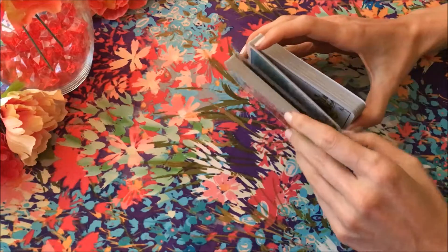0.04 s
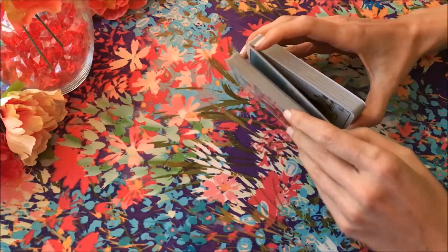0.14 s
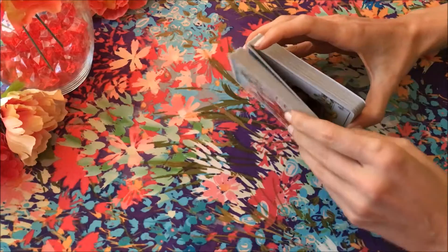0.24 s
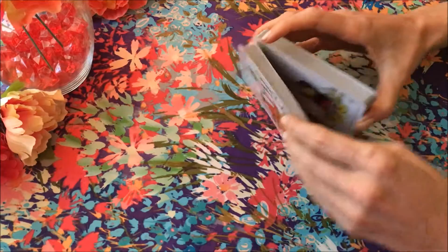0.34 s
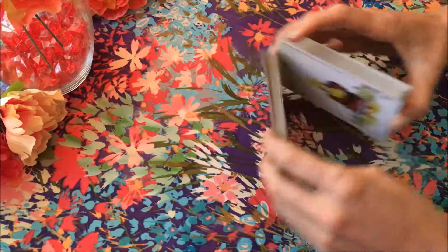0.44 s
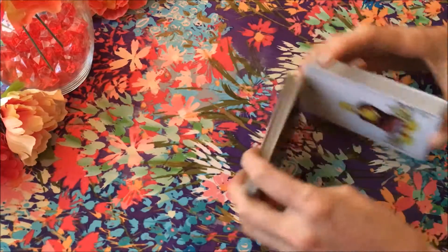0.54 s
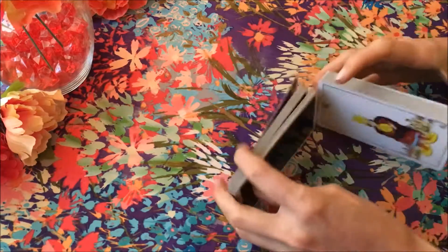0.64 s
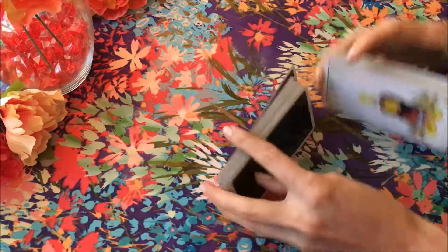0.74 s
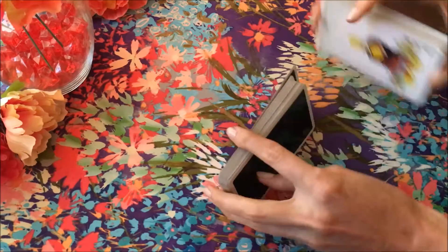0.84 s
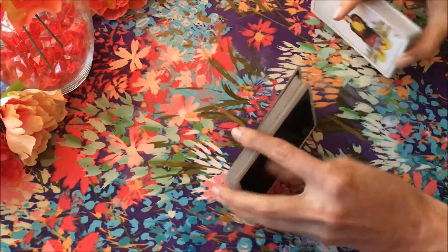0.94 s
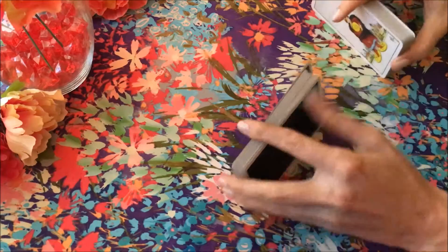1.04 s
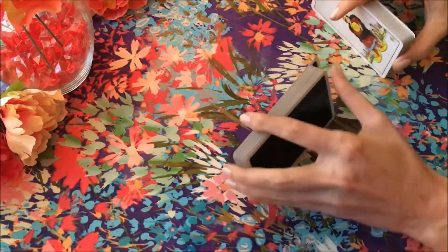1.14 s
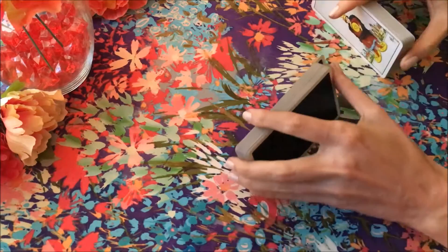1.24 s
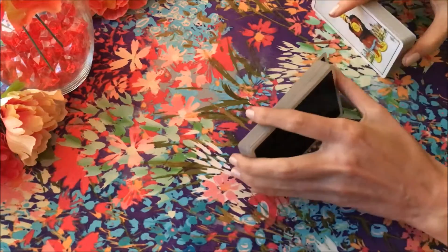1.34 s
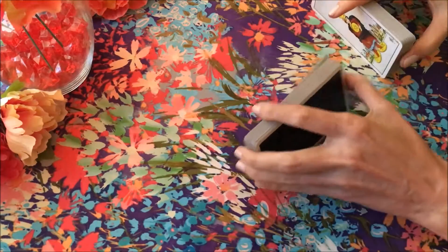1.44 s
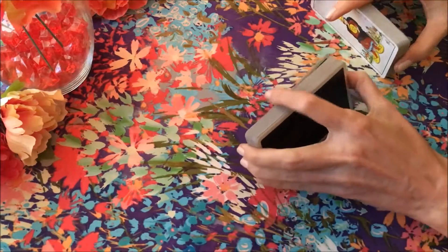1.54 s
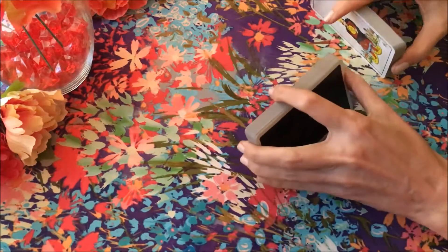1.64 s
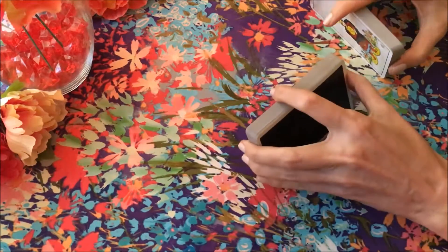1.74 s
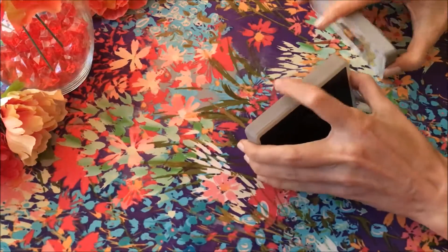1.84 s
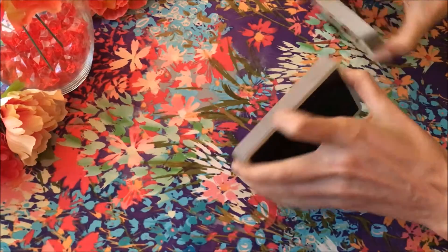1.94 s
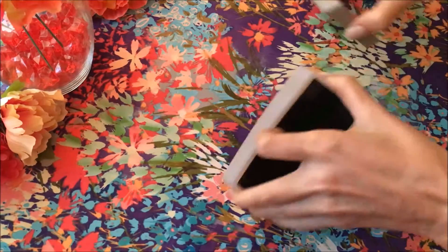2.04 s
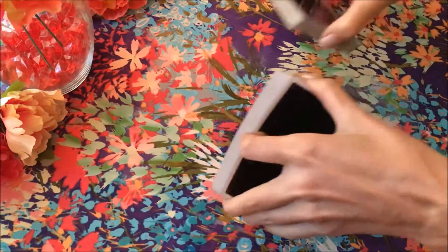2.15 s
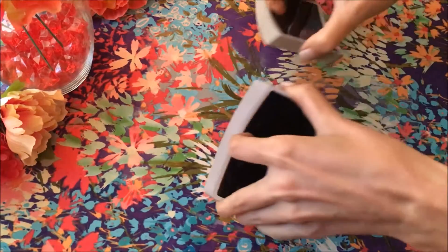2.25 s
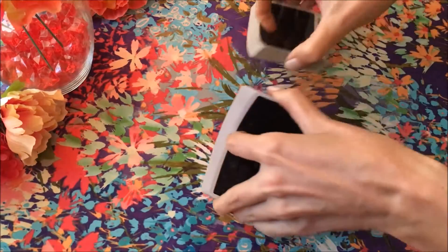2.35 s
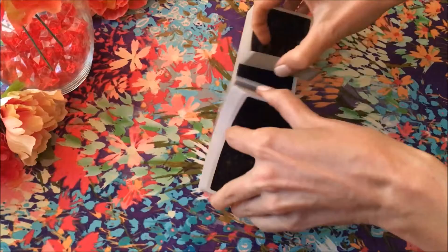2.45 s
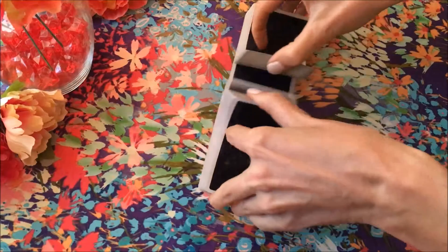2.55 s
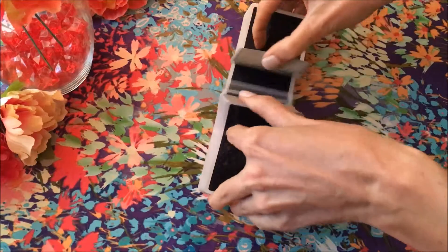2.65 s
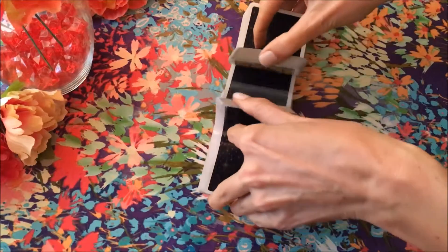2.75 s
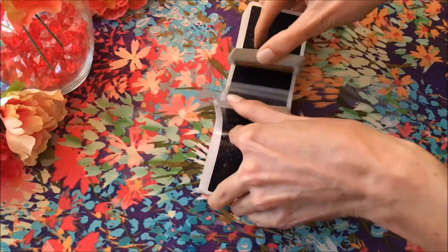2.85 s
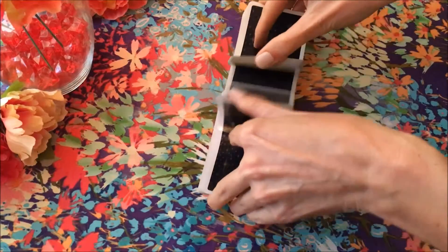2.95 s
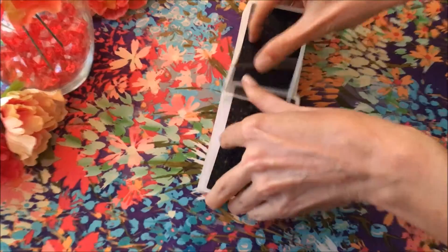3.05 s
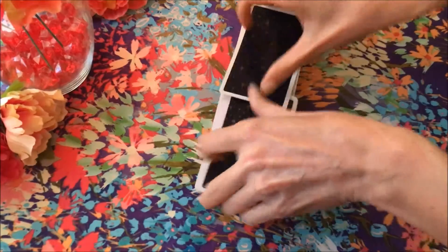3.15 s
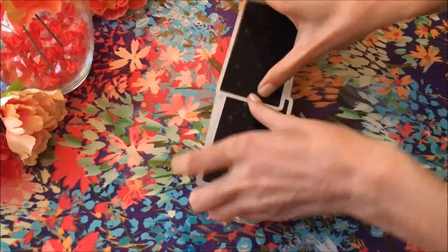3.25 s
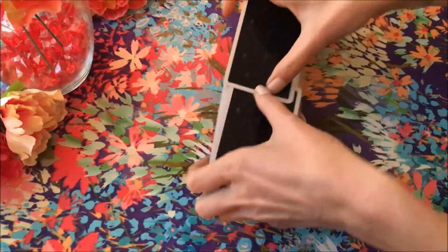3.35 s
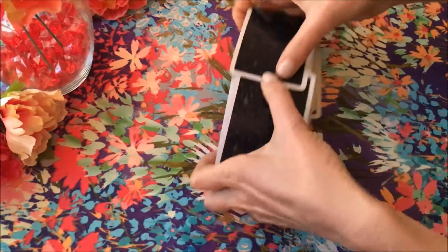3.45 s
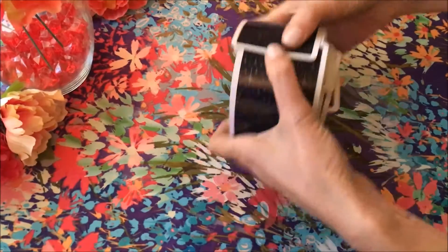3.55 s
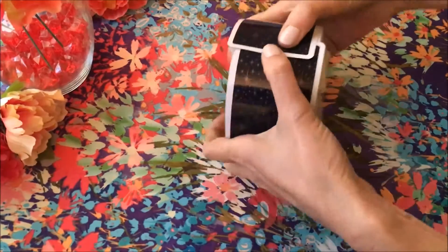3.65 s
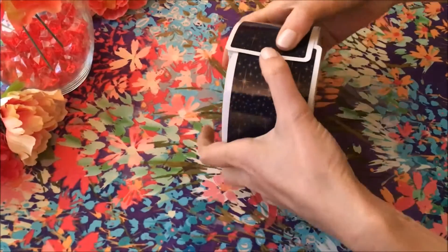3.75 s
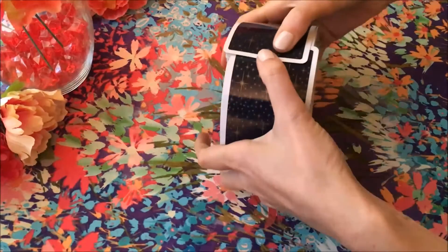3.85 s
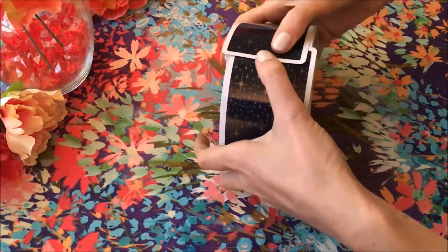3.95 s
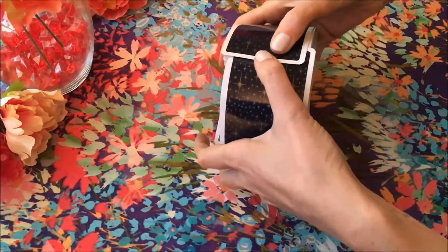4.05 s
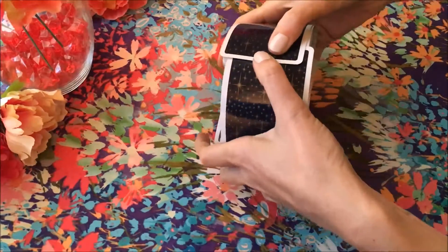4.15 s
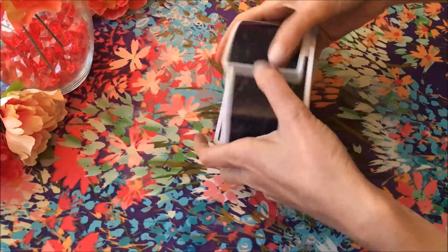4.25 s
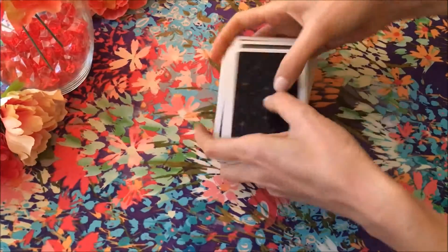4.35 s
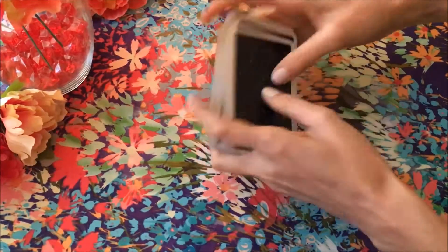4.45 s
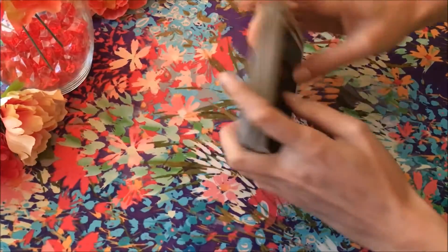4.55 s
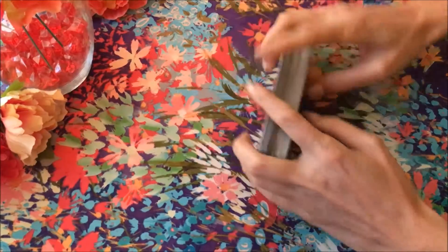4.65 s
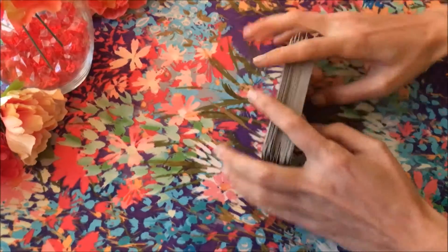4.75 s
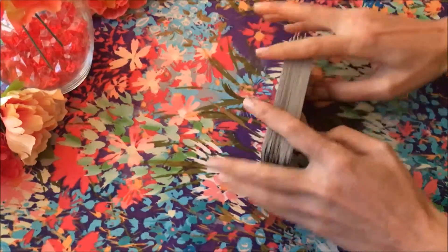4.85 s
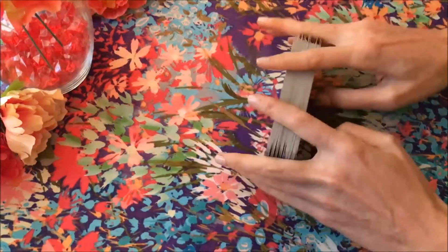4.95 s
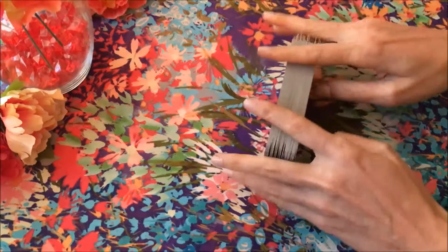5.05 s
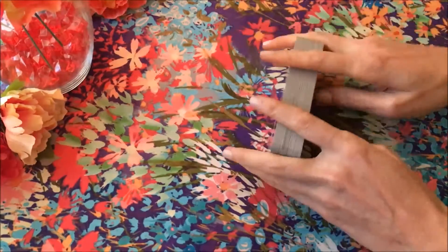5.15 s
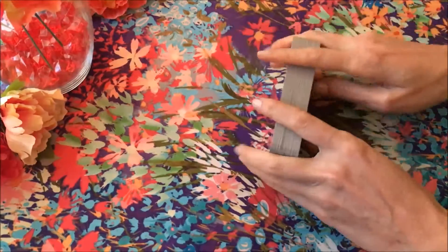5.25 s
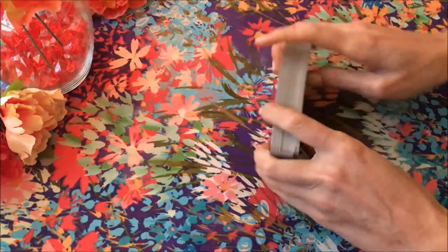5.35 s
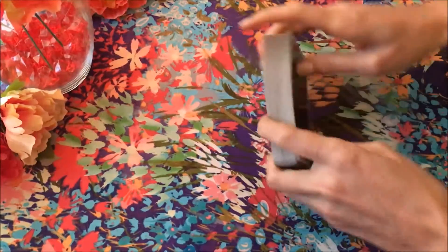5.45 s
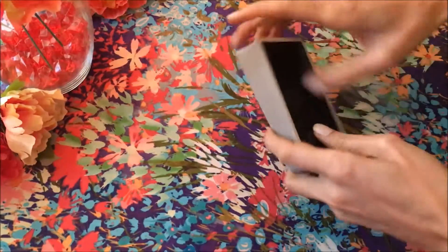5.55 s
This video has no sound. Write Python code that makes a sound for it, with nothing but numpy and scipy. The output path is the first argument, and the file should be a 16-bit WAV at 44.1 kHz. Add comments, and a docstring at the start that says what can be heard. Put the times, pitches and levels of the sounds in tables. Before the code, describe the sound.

Close single microphone, small room, low uneven room tone. Near silence at first with whispery finger rubs and two muffled taps; then a sudden crackling cluster of card snaps over rasping friction that grows and stops abruptly. A sparser, quieter slide with small clicks follows, then a blunt, slightly spread slap of the deck on a padded table, a weak second tap, and soft handling to the end.

```python
"""A small quiet room with a low rumble: two halves of a stiff card deck are tapped on a cloth-covered
table, pushed into each other with dense rustling and edge snaps, then knocked square.
Rubbing is filtered friction noise, snaps are short decaying air-pocket rings with edge ticks, knocks are
dulled noise bursts with table modes. Fingers brush the cards; reflections and room tone surround them,
and one microphone hears it all."""
import sys
import numpy as np
from scipy import signal
from scipy.io import wavfile
from scipy.ndimage import uniform_filter1d

SR = 44100
rng = np.random.default_rng(int(sys.argv[2]) if len(sys.argv) > 2 else 0)


def generate_wav(signal):
    """Clip the signal to [-1, 1] and save it as 16-bit WAV at the path in sys.argv[1]."""
    frames = np.transpose(np.atleast_2d(signal))
    scaled = np.clip(frames, -1, 1) * 32767
    pcm = np.round(scaled).astype(np.int16)
    wavfile.write(sys.argv[1], SR, pcm)


N = 246959  # samples

# The two pushes, one list each: t/s, rubbing level/dB, fine hiss level/dB
PUSH_LEVELS = [
    [(2.6, -46.5, -70), (2.666, -45, -55.5), (2.79, -43, -54), (2.86, -43.5, -46), (3.02, -41, -56),
     (3.09, -41.5, -65), (3.14, -37.5, -52), (3.22, -40, -39.5), (3.3, -79, -80)],
    [(3.756, -49.5, -78), (3.835, -86, -69.5), (3.865, -53, -60), (4.03, -57.5, -56), (4.12, -56, -58.5),
     (4.3, -47, -57), (4.35, -58, -61), (4.426, -48, -51.5), (4.506, -72, -74.5), (4.6, -95, -97)],
]
# Stiff card body, spectral density: f/Hz, level/dB per Hz
CARD_BODY_SPECTRUM = [(290, -47.5), (500, -2), (786, -8), (1030, 1), (1310, -2), (2100, 3.5), (2730, -5.5),
                      (3240, -8.5), (3740, -16.5), (5000, -33.5), (6500, -35.5), (11000, -120)]
# Card faces and edges, spectral density: f/Hz, level/dB per Hz
CARD_FACE_SPECTRUM = [(2060, -24), (3500, -2.5), (3750, -8), (4840, -11), (5860, -9.5), (6440, -10),
                      (7650, -12.5), (9200, -9.5), (12100, -16.5), (15200, -19), (16000, -43)]
# Hands pushing on deck and table, spectral density: f/Hz, level/dB per Hz
HAND_SHOVE_SPECTRUM = [(35, -30.5), (60, -11), (113, -0.5), (195, -9.5), (259, -5), (451, -9.5), (900, -23),
                       (1170, -37), (1980, -120)]
# Card edges snapping past each other: t/s, ring peak level/dB, ring f/Hz, crisp edge level/dB,
# ring decay constant/cycles
SNAP_EVENTS = [(2.581, -53.5, 1120, -81, 3.5), (2.602, -37, 1890, -74, 2.8), (2.623, -16, 1780, -45, 3.1),
               (2.63, -17.5, 1920, -34.5, 2.6), (2.64, -19.5, 1840, -41.5, 1.5),
               (2.697, -31, 1940, -61, 1.8), (2.736, -27.5, 1580, -49, 2.3),
               (2.804, -20.5, 1880, -41.5, 1.5), (2.829, -9, 2024, -33.5, 1.95),
               (2.896, -25.5, 1720, -31.5, 3.6), (2.903, -29, 2574, -40, 4.6),
               (2.934, -22, 2050, -39, 0.89), (2.958, -53, 3100, -34, 2.4),
               (2.966, -18.5, 2160, -38.5, 0.72), (3.013, -25, 1770, -33, 3),
               (3.023, -20, 1930, -33.5, 2.3), (3.031, -20, 2600, -37, 3.7), (3.044, -22.5, 1828, -31, 1),
               (3.070, -17.5, 1880, -34.5, 1.2), (3.08, -20, 1756, -35, 1), (3.082, -14.5, 1646, -41.5, .9),
               (3.087, -27, 2300, -31, 2), (3.114, -15.5, 1750, -57, 1.2), (3.121, -19, 1680, -39.5, 1.4),
               (3.128, -22, 2905, -46.5, 3.8), (3.136, -14, 1895, -25.5, 2.1), (3.146, -16, 3170, -32, 2.9),
               (3.169, -18, 1970, -38, 1.2), (3.185, -28, 2520, -45, 3.2), (3.218, -25, 2055, -35.5, 1.8),
               (3.755, -34.5, 1910, -64, 2.8), (3.875, -26.5, 1770, -41.5, 3.2),
               (3.923, -29, 1600, -56, 1.5), (3.956, -29.5, 2000, -45, 2), (4.014, -33, 1950, -63, 2.4),
               (4.033, -31, 1600, -49, 1), (4.16, -34, 1710, -65, 2.6), (4.176, -29.5, 1960, -54, 2.3),
               (4.185, -28.5, 1830, -57, 2), (4.225, -30, 1800, -62, 2.4), (4.268, -26, 1840, -53.5, 2.8),
               (4.28, -31.5, 1540, -51, 2.3), (4.308, -20.5, 1970, -49, 1.45),
               (4.413, -22, 1730, -58, 0.94), (4.417, -25.5, 2190, -46, 4.4),
               (4.456, -17.5, 1952, -49.5, 4.9), (4.464, -23.5, 2050, -72, 5.8)]
# Card edge rings: mean f/Hz, mean level/dB relative to the crisp edge, t60/s
EDGE_MODES = [(3250, 5.5, 0.0095), (6585, 7, 0.0066), (9150, 8, 0.005), (12520, -1.5, 0.00072)]
# The deck landing on the table: t/s, slap level/dB, hardness as top f/Hz, time to full contact/s,
# settling time constant/s, card body level/dB, table thump level/dB relative to slap, thump centre f/Hz
KNOCK_EVENTS = [(.754, -52.5, 1140, 0.0014, 0.042, -12, 10.5, 280),
                (1.145, -46.5, 1530, 0.0024, 0.036, -5.5, 3.5, 212),
                (4.776, -26, 3910, 0.031, 0.027, 10, -12.5, 469),
                (4.862, -40, 1260, 0.0091, 0.012, -15, -3.5, 327),
                (5.26, -66.5, 2005, 0.0205, 0.021, -7, 7.5, 330),
                (5.577, -73, 1500, 0.00372, 0.014, -2.5, 6.5, 300)]
# Table top modes: f/Hz, level/dB before the struck spot weights them, t60/s
TABLE_MODES = [(67.6, 1, 0.14), (128.1, 7.5, 0.16), (177.4, 2.5, 0.1), (281, 6.5, 0.059), (332, 9, 0.063),
               (384.5, 5, 0.12), (632, 6.5, 0.066), (945, -6, .08), (1165, -3, .1), (1770, 1, .08)]
# Fingers brushing and shifting the cards: loudest t/s, soft rub level/dB, fine hiss level/dB,
# swell time/s, fade time/s
BRUSH_STROKES = [(.282, -71, -80, .04, 0.041), (.446, -66.5, -75.5, 0.1, 0.1),
                 (.75, -71.5, -84, 0.18, 0.032), (.818, -68.5, -76, 0.17, 0.15),
                 (1.14, -61.5, -69.5, 0.073, 0.024), (1.216, -65.5, -74, 0.092, 0.26),
                 (1.59, -69, -80, 0.032, 0.18), (2.24, -80, -87, 0.88, 0.069),
                 (2.458, -67, -86, 0.059, 0.074), (3.44, -64, -68.5, 0.32, 0.16),
                 (3.68, -66, -74, 0.11, 0.15), (4.73, -74.5, -76.5, 0.28, .05),
                 (5.063, -63.5, -77.5, 0.13, 0.14), (5.276, -71.5, -76, 0.055, 0.085),
                 (5.54, -74.5, -75, 0.13, 0.088), (5.59, -75, -67, 0.035, 0.091)]
# Short soft rubs that sound the air pocket between cards: t/s, level/dB, f/Hz, length/s
POCKET_RUBS = [(3.384, -56.5, 1840, 0.053), (3.441, -56, 1913, 0.014), (3.645, -62.5, 2220, 0.063),
               (3.792, -54.5, 1900, 0.078), (4.086, -47, 1950, 0.024), (4.356, -37.5, 2120, 0.011),
               (4.397, -41.5, 2130, 0.012)]
# Near walls and ceiling: delay t/s, level/dB
NEAR_ECHOES = [(.0078, -16), (0.012, -24.5), (0.018, -26.5), (.026, -25.5)]
# Reverberation time: f/Hz, t60/s
ROOM_DECAY = [(100, 1), (300, 0.51), (900, 0.45), (2000, 0.39), (5000, 0.36), (12000, 0.22)]
# Room tone, spectral density: f/Hz, level/dB per Hz
AIR_SPECTRUM = [(15, -44), (25, -0.5), (49, 4), (114, 0.5), (206, -15), (263, -9), (317, -17), (439, -14.5),
                (503, -22), (1190, -20), (2910, -36), (10400, -43.5), (14800, -40), (16000, -45.5)]

SHOVE_DB, SHOVE_FOLLOW = -13, 0.81  # the hands' low shove follows this share of the rubbing's dB
SECOND_EDGE_S, SECOND_EDGE_DB = 0.00797, 1.5  # the deck lands on one corner, then flat
BRUSH_DEPTH_DB = 20  # rise over the swell time, fall over the fade time
AIR_DB = -60.5  # room tone before its rumble swells
LOW_CUT_HZ, EDGE_HZ = 42, 16100  # microphone bass roll-off, upper band limit


def amp(db):
    """Level law: a level in dB becomes an amplitude ratio."""
    return 10 ** (np.asarray(db) / 20)


def evened(x):
    """Normalisation: the signal is scaled to unit rms."""
    return x / np.sqrt(np.mean(x ** 2) + 1e-20)


def add(mix, s, sound):
    """Superposition: a sound is summed into the mix from s seconds on."""
    part = mix[round(s * SR):][:len(sound)]
    part += sound[:len(part)]


def filtered(x, order, hz, kind="lowpass"):
    """Linear filtering: a causal Butterworth filter with its cutoff in Hz."""
    return signal.sosfilt(signal.butter(order, hz, kind, fs=SR, output="sos"), x)


def colour(points, size=4096):
    """Minimum phase: log gain and its Hilbert transform give a causal response of unit energy."""
    f, db = np.transpose(points)
    hz = abs(np.fft.fftfreq(size, 1 / SR))
    curve_db = np.interp(np.log(hz + 1), np.log(f + 1), db)
    log_gain = np.log(amp(np.maximum(curve_db, -100)))
    spectrum = np.exp(np.conj(signal.hilbert(log_gain)))
    taps = np.fft.ifft(spectrum).real[:size // 2]
    return taps / np.linalg.norm(taps)


def drift(cutoff_hz):
    """Low-passed noise: a slow random wander of unit rms."""
    return evened(filtered(rng.standard_normal(N), 2, cutoff_hz))


def levels(tables):
    """Piecewise-linear dB envelopes as gains, silent outside the tables."""
    t, out = np.arange(N) / SR, np.zeros((len(tables[0][0]) - 1, N))
    for rows in tables:
        s, *dbs = np.transpose(rows)
        active = (t >= s[0]) & (t < s[-1])
        out += active * amp([np.interp(t, s, db) for db in dbs])
    return uniform_filter1d(out, size=200)


def catch_sizes(spread_db):
    """Exponential statistics: uneven catch sizes, their dB capped at four spreads."""
    return amp(spread_db * np.minimum(rng.exponential(1, N), 4))


def slide():
    """Sliding friction: card faces rub and catch; body, hiss and hand shove stutter together."""
    rub, hiss = levels(PUSH_LEVELS) * amp(0.8 * drift(40))
    shove = amp(SHOVE_DB) * rub_power_law(rub)
    rub = rub * evened(chatter(600, 4.7) + 2.64 * rng.standard_normal(N))
    out = signal.oaconvolve(rub, colour(CARD_BODY_SPECTRUM))
    out += signal.oaconvolve(hiss * grit(1300, 2.2, 1.5), colour(CARD_FACE_SPECTRUM))
    out += signal.oaconvolve(shove * grit(150, 4.8, 0.77), colour(HAND_SHOVE_SPECTRUM))
    return out[:N]


def rub_power_law(rub):
    """Power law: the shove's dB is a fixed share of the rubbing's dB."""
    return abs(rub) ** SHOVE_FOLLOW


def chatter(per_s, spread_db, count=16):
    """Stick-slip: small unseen slips, each of several cards with its own pitch and short ring."""
    t, out = np.arange(300) / SR, np.zeros(N)
    pitches = np.geomspace(900, 3600, count)
    for hz, cycles in zip(pitches, rng.uniform(0.99, 1.3, count)):
        slips = catch_sizes(spread_db) * (rng.random(N) < per_s / count / SR)
        ring = np.exp(-t * hz / cycles) * np.sin(2 * np.pi * hz * t)
        out += signal.oaconvolve(slips, evened(ring))[:N]
    return evened(out)


def grit(per_s, spread_db, smooth):
    """Asperity contact: sparse catches of uneven size and random sign over smooth noise."""
    size = catch_sizes(spread_db) * rng.choice([-1, 1], N)
    catches = evened(size * (rng.random(N) < per_s / SR))
    return evened(catches + smooth * rng.standard_normal(N))


def snaps():
    """Sudden release: the air pocket between cards rings, the edge ticks, the card scrapes to rest."""
    out, t = np.zeros(N), np.arange(3000) / SR
    for s, db, hz, crisp_db, cycles in SNAP_EVENTS:
        noise = rng.standard_normal(len(t))
        u = t * hz / cycles  # time in decay constants
        ring = (1 - np.exp(-3 * u)) * np.exp(-u) * np.sin(2 * np.pi * hz * t)
        flick = np.exp(-t / 0.00015) * np.sin(2 * np.pi * 900 * t)  # the card's broad first push
        settle = signal.oaconvolve(noise * np.exp(-t / 0.017), colour(CARD_BODY_SPECTRUM))[:len(t)]
        # long rings come from clean releases
        rough = amp(-3 * cycles) * flick + amp(-1.2 * cycles - 14.5) * settle
        scrape = signal.oaconvolve(noise * np.exp(-t / 0.024), colour(CARD_FACE_SPECTRUM))[:len(t)]
        edge = edge_ring(t) * (1 - np.exp(-t / 0.00015))
        crisp = amp(crisp_db) * (edge + amp(-3.5) * scrape)
        add(out, s, amp(db) * (ring / abs(ring).max() + rough) + crisp)
    return out


def edge_ring(t):
    """Modal vibration: damped edge modes, level and pitch scattered by 3 dB and 4 % (one sigma)."""
    out = np.zeros(len(t))
    for f, db, t60 in EDGE_MODES:
        level_scatter, pitch_scatter = rng.standard_normal(2)
        decay = amp(db + 3 * level_scatter - 60 * t / t60)
        out += decay * np.sin(2 * np.pi * f * (1 + .04 * pitch_scatter) * t)
    return out


def knocks():
    """Distributed impact: card edges arrive in turn, dulled by the cloth, and the table top rings."""
    out, t = np.zeros(N), np.arange(SR // 2) / SR
    for s, db, top_hz, rise, settle, card_db, thump_db, centre_hz in KNOCK_EVENTS:
        sign, size = rng.standard_normal((2, len(t)))
        contact = np.minimum(t / rise, 1) ** 2 * np.exp(-np.maximum(t - rise, 0) / settle)
        arrivals = sign * amp(6.6 * size) * contact
        dulled = filtered(arrivals, 3, top_hz)
        slap = filtered(dulled, 2, 0.36 * top_hz, "highpass")
        slap += amp(card_db) * signal.oaconvolve(dulled, colour(CARD_BODY_SPECTRUM))[:len(t)]
        slap += amp(-36.5) * signal.oaconvolve(arrivals, colour(CARD_FACE_SPECTRUM))[:len(t)]
        # the deck's weight lands just before full contact
        blow = np.exp(-((t - .7 * rise) / 0.00018) ** 2)
        second = np.exp(-((t - 0.701 * rise - SECOND_EDGE_S) / 0.00053) ** 2)
        blow += amp(SECOND_EDGE_DB) * second
        force = evened(blow) + 3.2 * evened(arrivals)
        thump = signal.oaconvolve(force, table_top(t, centre_hz))[:len(t)]
        loud = slice(0, SR // 20)  # both levels refer to the first 50 ms
        slap, thump = slap / slap[loud].std(), thump / thump[loud].std()
        add(out, s, amp(db) * (slap + amp(thump_db) * thump))
    return out


def table_top(t, centre_hz):
    """Modal excitation: the spot struck favours the table modes near its centre frequency."""
    out = np.zeros(len(t))
    for hz, db, t60 in TABLE_MODES:
        octaves = abs(np.log2(hz / centre_hz))
        out += amp(db - 6.2 * octaves - 60 * t / t60) * np.sin(2 * np.pi * hz * t)
    return out


def brush():
    """Smooth friction: skin on glossy card whispers, each stroke swelling and fading linearly in dB."""
    t, power = np.arange(N) / SR, np.zeros((2, N))
    for s, rub_db, hiss_db, swell, fade in BRUSH_STROKES:
        away = np.maximum((s - t) / swell, (t - s) / fade)
        power += (amp([[rub_db], [hiss_db]]) * amp(-BRUSH_DEPTH_DB * away)) ** 2
    rub, hiss = np.sqrt(power) * amp(0.5 * drift(25)) * rng.standard_normal((2, N))
    body = signal.oaconvolve(rub, colour(CARD_BODY_SPECTRUM))
    return (body + signal.oaconvolve(hiss, colour(CARD_FACE_SPECTRUM)))[:N]


def rubs():
    """Resonance: a swell of friction noise is heard through one broad air-pocket resonance."""
    out, t = np.zeros(N), np.arange(SR // 8) / SR
    for s, db, hz, length in POCKET_RUBS:
        tone = filtered(rng.standard_normal(len(t)), 2, [hz * 0.84, hz * 1.094], "bandpass")
        swell = np.sin(np.pi * np.minimum(t / length, 1))
        add(out, s, amp(db) * evened(tone) * swell)
    return out


def room(x):
    """Reverberation: near reflections and sparse random taps whose treble dies faster."""
    taps = np.zeros(SR // 2)
    at = np.arange(300, len(taps) - 20, 20)
    taps[at + rng.integers(0, 20, len(at))] = rng.choice([-1., 1.], len(at))
    hz, t, bands = signal.stft(taps, SR, nperseg=256)
    f, t60 = np.transpose(ROOM_DECAY)
    decay = amp(-60 * t / np.interp(hz, f, t60)[:, None])
    tail = signal.istft(bands * decay, SR, nperseg=256)[1]
    tail *= amp(-11.5) / np.linalg.norm(tail)
    for s, db in NEAR_ECHOES:
        tail[round(s * SR)] += amp(db)
    return signal.oaconvolve(x, tail)[:N]


def air():
    """Stationary noise with modulation: room tone whose rumble below 200 Hz swells in lumps."""
    noise = rng.standard_normal(N)
    tone = evened(signal.oaconvolve(noise, colour(AIR_SPECTRUM, size=16384))[:N])
    rumble = filtered(tone, 2, 200)
    return amp(AIR_DB) * (tone + rumble * (amp(0.5 * drift(5.0)) - 1))


def scene():
    """Superposition: direct sound of cards and table, its reflections and the room tone."""
    cards = slide() + snaps() + knocks() + brush() + rubs()
    return (cards + room(cards) + air())[None]


def record(dry):
    """Band limitation: the small microphone's bass roll-off, then a linear-phase upper limit."""
    thin = filtered(dry, 4, LOW_CUT_HZ, "highpass")
    band_limit = signal.firwin(511, EDGE_HZ, window=("kaiser", 9), fs=SR)
    return signal.oaconvolve(thin, band_limit[None], "same")


dry = scene()
out = record(dry)
generate_wav(out)
```